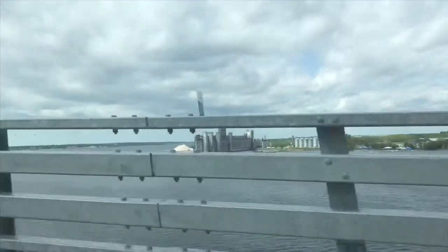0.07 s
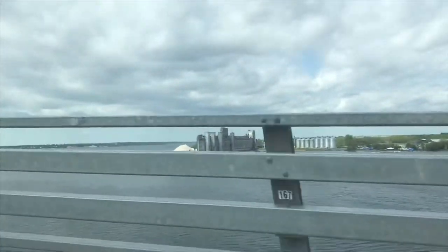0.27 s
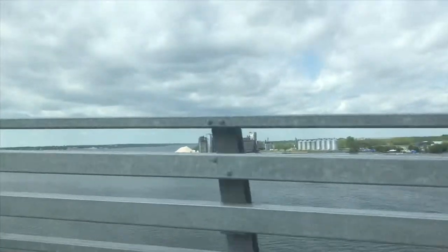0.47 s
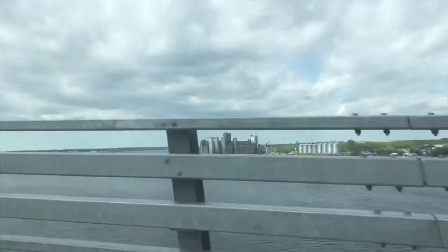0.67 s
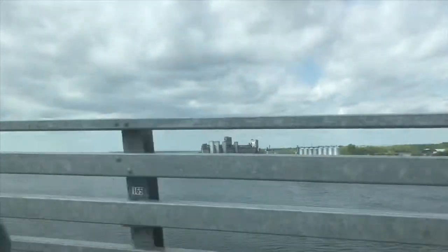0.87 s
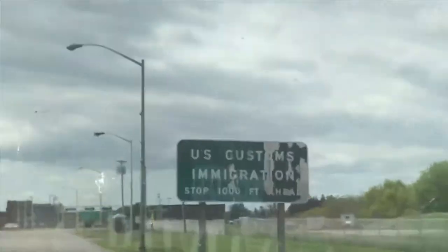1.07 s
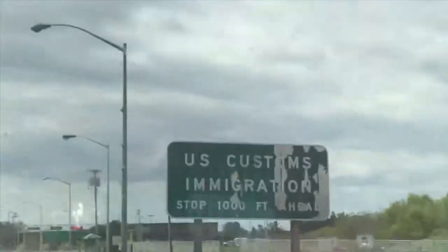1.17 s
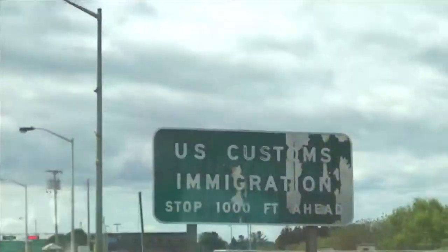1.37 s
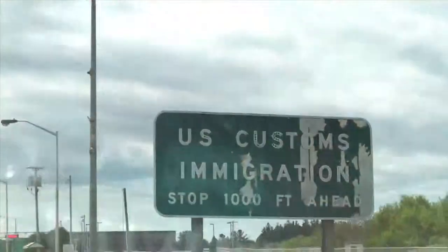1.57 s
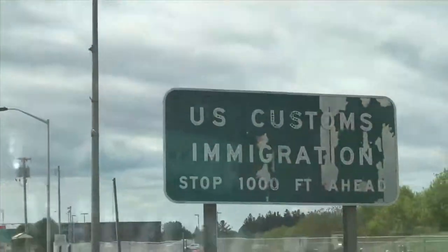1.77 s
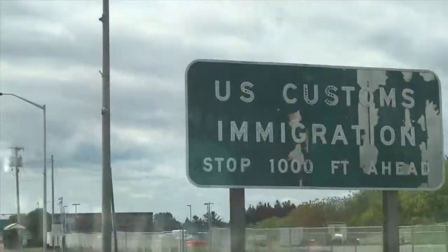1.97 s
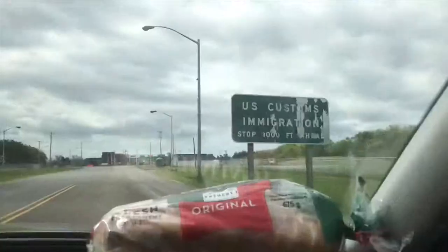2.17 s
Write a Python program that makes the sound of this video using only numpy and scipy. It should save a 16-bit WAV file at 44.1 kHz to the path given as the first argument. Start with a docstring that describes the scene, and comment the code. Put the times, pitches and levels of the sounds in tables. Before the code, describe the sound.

Inside a moving car, a strong fluttering tyre drone and low roar fill the cabin for about a second, then abruptly drop to muffled road noise with soft thumps, faint hiss and small trim rattles.

```python
"""Car cabin, steel bridge then road

The tyres sing on the ribs of a steel bridge deck: a sine at the rib rate with rough overtones, which
stumbles at each panel joint. Shaken resonances and a roar whose treble pulses with the ribs lie around it.
After about a second the sound cuts to a quieter road of dull noise and a hiss that comes and goes.
Bumps ring low modes of body and cabin; the trim ticks, knocks and squeaks faintly."""
import sys
import numpy as np
from scipy import signal
from scipy.fft import rfft, irfft, next_fast_len
from scipy.io import wavfile
from scipy.ndimage import map_coordinates

SR = 44100
rng = np.random.default_rng(int(sys.argv[2]) if len(sys.argv) > 2 else 0)


def unload_audio(sound):
    """Save the sound as a 16-bit wav file, at the path given as the first command line argument."""
    columns = np.transpose(np.atleast_2d(sound))
    # keep every value between -1 and 1, then stretch to whole-number steps
    steps = np.round(np.clip(columns, -1, 1) * 32767)
    wavfile.write(sys.argv[1], SR, steps.astype(np.int16))


N = 97593

# Road rolling noise, relative spectrum: freq_hz, density_db
ROAD_ROAR_SPECTRUM = [(15, -18.5), (35, 8), (60, -1), (115, 2), (160, -9), (215, -8), (250, -19),
                      (390, -17), (470, -29.5), (700, -34), (1000, -31), (1500, -40), (2200, -46.5),
                      (4000, -60), (8000, -63.5)]
# Road hiss, relative spectrum: freq_hz, density_db
ROAD_HISS_SPECTRUM = [(1200, -21.5), (2600, 4.5), (4000, 2), (6000, 0), (8000, -4.5), (10000, -5.5),
                      (13000, -7), (15500, -10)]
# Road hiss course, before the overall hiss gain: time_s, level_db
ROAD_HISS_COURSE = [(1.06, -66.5), (1.13, -67.5), (1.18, -74.5), (1.32, -76), (1.385, -72.5),
                    (1.415, -64.5), (1.48, -70), (1.525, -68), (1.565, -69.5), (1.61, -66.5), (1.75, -65),
                    (1.84, -71.5), (1.95, -64.5), (2.04, -71), (2.09, -82), (2.2, -80)]
# Bright ticks of the trim: start_s, level_db
TICKS = [(.913, -42.5), (1.239, -68.5), (1.351, -65), (1.589, -68.5), (1.605, -55.5), (1.611, -62.5),
         (1.697, -63.5), (1.736, -45), (1.745, -55), (1.764, -59)]
# Ticks, relative spectrum: freq_hz, density_db
TICK_SPECTRUM = [(1500, -13.5), (3000, 1), (5000, -9.5), (8000, -3.5), (11000, -5.5), (14500, -0.5)]
# Dull knocks of the trim: start_s, level_db
KNOCKS = [(1.066, -45.5), (1.178, -48), (1.955, -47)]
# Bumps in deck and road, sharper ones pushing higher: start_s, strength_db, push_centre_hz
BUMPS = [(0.895, -14.5, 54.6), (1.091, -21.5, 44.8), (1.371, -13, 93), (1.408, -13, 106),
         (1.452, -14.5, 66), (1.52, -25.5, 75.4), (1.579, -20, 73.5), (1.603, -12.5, 153),
         (1.646, -14, 37.7), (1.72, -11, 94), (1.868, -33, 59.5), (1.922, -15.5, 84), (2.016, -20, 40)]
# Modes of body and cabin, before detuning: freq_hz, level_db, t60_s
BOOM_MODES = [(39.36, 3.5, 0.16), (63.6, 0.5, 0.2), (91, -7, 0.19), (108.5, 3, .18), (144, -4.5, .14),
              (205, -16.5, 0.034), (284, -17.5, 0.29)]
# Bridge roar, relative spectrum: freq_hz, density_db
DECK_ROAR_SPECTRUM = [(18, -35.5), (38, -3.5), (65, -11), (115, -0.5), (160, -4.5), (240, -11), (340, -6),
                      (400, -22), (520, -27), (680, -23), (850, -32.5), (1300, -38.5), (1800, -40.5),
                      (2200, -48.5), (2900, -46), (3700, -58), (6000, -79.5)]
# Bridge hiss, relative spectrum: freq_hz, density_db
DECK_HISS_SPECTRUM = [(3000, -7.5), (4000, 1.5), (5000, -3), (6500, -2), (7800, -5.5), (9500, -5),
                      (10400, -10), (11600, -6), (15500, -4)]
# Resonances of tyres and cabin shaken by the deck: freq_hz, width_hz, level_db
SHAKEN_RESONANCES = [(81.4, 12, -27), (200.2, 6.8, -32), (427.7, 4.1, -48.5), (601, 55, -40),
                     (679, 45, -49.5), (2556, 170, -66)]
# Panel joints where the ribs fall out of step: centre_s
JOINT_TIMES_S = [.008, .322, .962]
# Fundamental of the drone, before flutter and joint dips: time_s, level_db
DRONE_COURSE = [(0.0, -21), (0.03, -13.5), (0.05, -10.5), (0.312, -25), (0.38, -13), (0.434, -13.5),
                (0.502, -20), (0.57, -16.5), (0.632, -23), (0.684, -15), (0.744, -14), (0.852, -25),
                (0.88, -19), (0.942, -16.5), (0.962, -31), (0.988, -12.5), (1.02, -17.5)]
# Overtones of the rib rate; alternate ribs differ, giving the halves: multiple, level_db, roughness_0_to_1
OVERTONES = [(1.5, -45, 1), (2, -38.5, .8), (2.5, -51.5, 0.8), (3, -55, .5), (4, -59.5, 0.5),
             (5, -67.5, 0.7), (6, -72.5, 0.5)]

CUT_S, FADE_OUT_S, FADE_IN_S = 1.039, 0.026, 0.024
TREBLE_LEAD_S = 0.008  # bridge treble fades out this much sooner
TICK_T60_S = 0.015
KNOCK_HZ, KNOCK_WIDTH_HZ, KNOCK_T60_S = 596, 280, 0.12
SQUEAK_S, SQUEAK_HZ, SQUEAK_WIDTH_HZ, SQUEAK_HALF_S, SQUEAK_DB = 1.526, 2800, 45, 0.009, -63
PUSH_OCTAVES, BUMP_ATTACK_S = 0.6, 0.007  # spread of a bump's push; time constant of its rise
RIB_HZ, RIB_WANDER = 313.7, 0.0017  # mean ribs per second; relative unsteadiness
JOINT_S, JOINT_DIP = 0.0059, 0.9  # crossing time; share of drone amplitude lost at the centre
MIC_LOW_HZ, TOP_HZ = 28.9, 15750


def amp(db):
    """Decibels to gain."""
    return 10 ** (np.asarray(db) / 20)


def unit(x):
    """Scale to rms 1."""
    return x / np.sqrt(np.mean(x ** 2) + 1e-20)


def clock():
    """Time of every sample in seconds."""
    return np.arange(N) / SR


def curve(rows):
    """(time_s, value) rows joined by straight lines."""
    return np.interp(clock(), *np.transpose(rows))


def wobble(knots_per_s):
    """Smooth random curve through normally distributed knots."""
    return map_coordinates(rng.standard_normal(2048), [clock() * knots_per_s + 2], mode="wrap")


def fade(u):
    """Smooth ramp from 0 to 1 as u goes from 0 to 1."""
    return np.sin(np.pi / 2 * np.clip(u, 0, 1)) ** 2.2


def filtered(x, response):
    """Multiply the spectrum of x by a response of frequency, zero-padded."""
    m = next_fast_len(N + SR // 2)
    return irfft(rfft(x, m) * response(np.fft.rfftfreq(m, 1 / SR)), m)[:N]


def noise(spectrum):
    """Noise of rms 1 coloured by (freq_hz, density_db) points on a log frequency axis."""
    freq_hz, density_db = np.transpose(spectrum)

    def gain(hz):
        return amp(np.interp(np.log(hz + 1), np.log(freq_hz + 1), density_db, left=-120))

    return unit(filtered(rng.standard_normal(N), gain))


def ringing(freq_hz, width_hz):
    """Randomly shaken resonance with steep skirts, rms 1."""
    def response(hz):
        return 1 / (1 + ((hz - freq_hz) / width_hz) ** 2) ** 1.5

    return unit(filtered(rng.standard_normal(N), response))


def decays(events, t60_s):
    """Sum of envelopes: sudden rise, then a steady fall in dB."""
    t = clock()
    return sum((t >= start_s) * amp(db - 60 * np.abs(t - start_s) / t60_s) for start_s, db in events)


def road(roar_db=-31, swell_db=1, hiss_gain_db=-1, grain_db=2.8):
    """Rolling on the road: dull noise that swells slightly, and a grainy hiss that comes and goes."""
    roar = amp(roar_db + swell_db * wobble(12)) * noise(ROAD_ROAR_SPECTRUM)
    hiss_db = curve(ROAD_HISS_COURSE) + hiss_gain_db + grain_db * wobble(700)
    hiss = amp(hiss_db) * noise(ROAD_HISS_SPECTRUM)
    return fade((clock() - CUT_S) / FADE_IN_S) * (roar + hiss)


def trim():
    """Small cabin sounds: decaying noise ticks, decaying resonant knocks and a narrow-band squeak."""
    ticks = noise(TICK_SPECTRUM) * decays(TICKS, TICK_T60_S)
    knocks = ringing(KNOCK_HZ, KNOCK_WIDTH_HZ) * decays(KNOCKS, KNOCK_T60_S)
    squeak_envelope = amp(SQUEAK_DB) * np.exp(-((clock() - SQUEAK_S) / SQUEAK_HALF_S) ** 2)
    squeak = squeak_envelope * ringing(SQUEAK_HZ, SQUEAK_WIDTH_HZ)
    return ticks + knocks + squeak


def bumps(detune=0.033):
    """Each bump rings the low modes of body and cabin near its push, each randomly detuned."""
    out = np.zeros(N)
    for start_s, strength_db, push_hz in BUMPS:
        t = np.maximum(clock() - start_s, 0)
        rise = 1 - np.exp(-t / BUMP_ATTACK_S)
        for freq_hz, mode_db, t60_s in BOOM_MODES:
            push = np.exp(-0.5 * (np.log2(freq_hz / push_hz) / PUSH_OCTAVES) ** 2)
            decay = amp(strength_db + mode_db - 60 * t / t60_s)
            detuned_hz = freq_hz * (1 + detune * rng.standard_normal())
            out -= push * rise * decay * np.sin(2 * np.pi * detuned_hz * t)
    return out


def rib_turns():
    """Ribs passed so far; each joint slips the count by half a rib."""
    t = clock()
    slips = sum(0.5 * np.clip((t - s) / JOINT_S + 0.5, 0, 1) for s in JOINT_TIMES_S)
    rate_hz = RIB_HZ * (1 + RIB_WANDER * wobble(12))
    return np.cumsum(rate_hz) / SR - slips


def drone(turns, flutter_db=0.86, flutter_rate=50, rough_rate=45):
    """Tyre note: a fluttering fundamental under rough overtones, all dipping at the joints."""
    t = clock()
    grip = np.prod([1 - JOINT_DIP * np.exp(-((t - s) / JOINT_S) ** 2) for s in JOINT_TIMES_S], axis=0)
    level_db = curve(DRONE_COURSE) + flutter_db * wobble(flutter_rate)
    note = amp(level_db) * np.sin(2 * np.pi * turns)
    for multiple, db, rough in OVERTONES:
        # steady part plus random complex part: amplitude and phase both waver
        random_part = wobble(rough_rate) + 1j * wobble(rough_rate)
        size = np.sqrt(1 - rough) + np.sqrt(rough / 2) * random_part
        note = note + amp(db) * np.real(size * np.exp(1j * np.pi * round(2 * multiple) * turns))
    return np.sqrt(2) * grip * note  # levels are rms


def bridge(roar_db=-26, hiss_at_cut_db=-65, hiss_rise_db_per_s=2, pulsing=0.4, swell_db=1.1, sag_db_per_s=3):
    """Drone, shaken resonances, a rising hiss, and a roar whose treble pulses with the ribs and eases."""
    turns, left_s = rib_turns(), CUT_S - clock()
    roar = noise(DECK_ROAR_SPECTRUM)
    bass = filtered(roar, lambda hz: 1 / (1 + (hz / 800) ** 8))
    pulses = unit(1 + pulsing * np.cos(2 * np.pi * turns))
    slap_gain = amp(swell_db * wobble(45) + sag_db_per_s * (left_s - CUT_S / 2))
    slap = (roar - bass) * pulses * slap_gain
    body = sum(amp(db) * ringing(freq_hz, width_hz) for freq_hz, width_hz, db in SHAKEN_RESONANCES)
    hiss = amp(hiss_at_cut_db - hiss_rise_db_per_s * left_s) * noise(DECK_HISS_SPECTRUM)
    low = drone(turns) + body + amp(roar_db) * bass
    high = amp(roar_db) * slap + hiss
    return fade(left_s / FADE_OUT_S) * low + fade((left_s - TREBLE_LEAD_S) / FADE_OUT_S) * high


def scene():
    """Bridge, then road; bumps (muted at the cut) and trim over both."""
    jolts = fade(np.abs(clock() - CUT_S) / FADE_IN_S) * bumps()
    return (road() + trim() + jolts + bridge())[None]


def record(dry):
    """Microphone: loses the deepest bass and keeps nothing from TOP_HZ up."""
    low_cut = signal.butter(6, MIC_LOW_HZ, "highpass", fs=SR, output="sos")
    return filtered(signal.sosfilt(low_cut, dry[0]), lambda hz: hz < TOP_HZ)[None]


dry = scene()
out = record(dry)
unload_audio(out)
```